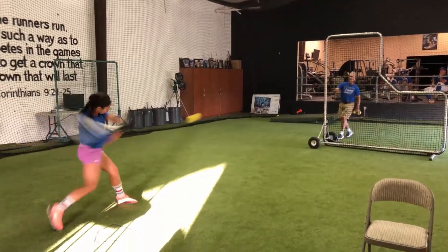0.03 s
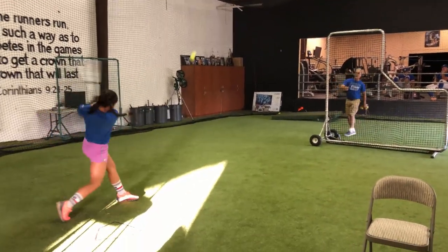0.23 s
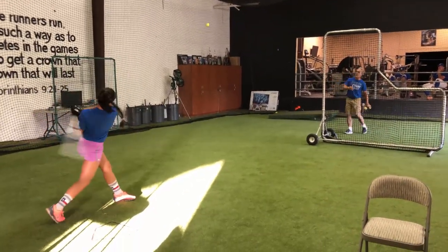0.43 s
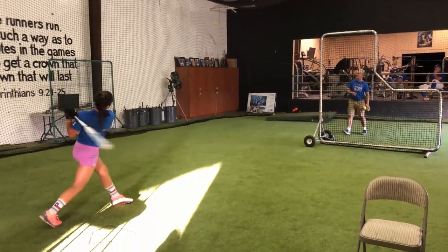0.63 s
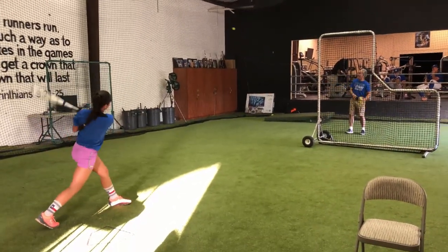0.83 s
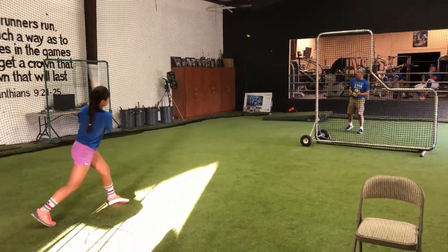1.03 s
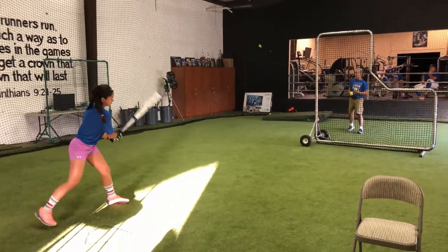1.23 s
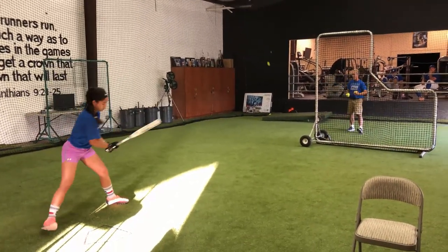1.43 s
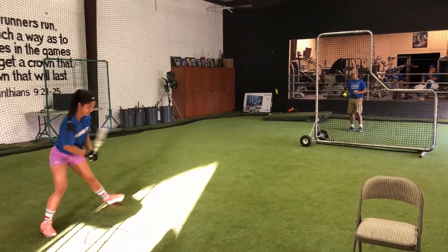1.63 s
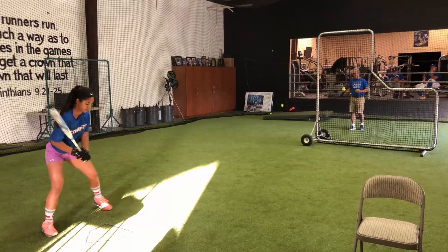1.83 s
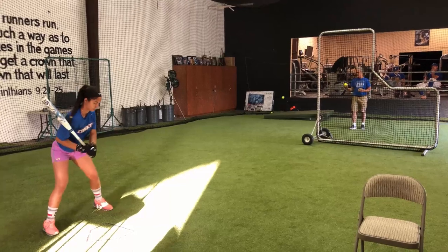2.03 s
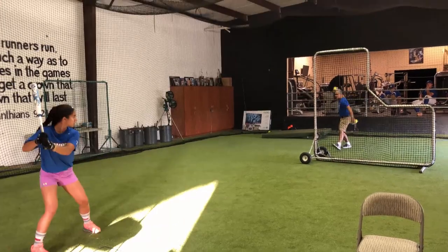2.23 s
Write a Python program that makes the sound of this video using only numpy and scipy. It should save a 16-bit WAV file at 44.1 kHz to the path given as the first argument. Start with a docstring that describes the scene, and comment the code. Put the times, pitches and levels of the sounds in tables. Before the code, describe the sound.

A metal bat hits a softball with a hard, ringing crack that echoes through a large indoor batting hall. The ball slaps into distant netting, then lands with a soft low thud, over faint steady ventilation.

```python
"""In a big indoor batting hall, a metal bat swishes and hits a softball with a hard crack.
The impact excites modes of bat and ball, whose ring hangs in the room as reverberation.
Half a second later the ball slaps into the far netting and the wall behind it rumbles.
A shoe scuffs the turf and the ball lands with a low thud, over the steady rush of ventilation."""
import sys
import numpy as np
from scipy import signal
from scipy.fft import rfft, irfft, next_fast_len
from scipy.io import wavfile
from scipy.ndimage import map_coordinates

SR = 44100
rng = np.random.default_rng(int(sys.argv[2]) if len(sys.argv) > 2 else 0)


def dump_mix(stems):
    """Bounce the given channels to the path in sys.argv[1] as a 16-bit WAV at rate SR."""
    frames = np.atleast_2d(stems).T  # one column per channel
    limited = np.clip(frames, -1, 1)  # hard clip at full scale
    pcm = np.round(limited * 32767).astype(np.int16)
    wavfile.write(sys.argv[1], SR, pcm)


N = 101429

HIT_S, CONTACT_S = 0.2126, 0.0013
HALL_DELAY_S, HALL_BUILD_S = 0.014, 0.003
# Modes of bat and ball. Each row: frequency in Hz, relative direct level in dB, T60 in seconds,
# level over the crack in the hall in dB, spread in the hall in Hz.
BAT_MODES = [(500, -13, .014, 0.5, 200), (649.5, -11, .016, 2.5, 240), (1212, -11.5, 0.016, 10, 120),
             (1406, -22, .022, 11.5, 62), (1852, -17, .014, -12, 72), (2230, -21.5, 0.012, 5.5, 120),
             (2935, -10, 0.0076, -9, 120), (3440, -30, 0.04, 8.5, 55), (3640, -28, 0.0067, 13.5, 40),
             (4840, -18, 0.037, 9.5, 88), (5087, -26.5, 0.024, 14.5, 110), (6360, -9.5, 0.011, 6, 170),
             (6736, -20.5, 0.019, 10.5, 130), (7440, -22.5, .014, -4, 120), (9960, -15, .011, 0.5, 390)]


def bat():
    """Impact excitation: a noisy crack and damped modes, the lower ones starting later and more slowly."""
    sound = amp(-14.5) * rng.standard_normal(N) * fall(since(0), t60=0.012)
    for hz, db, t60, _, _ in BAT_MODES:
        slowness = max(1, 2480 / hz)
        lag = 1.2 / hz  # 1.2 cycles
        envelope = swell(lag, CONTACT_S * slowness, 0, t60)
        sound += 2 * amp(db) * slowness ** .5 * np.sin(2 * np.pi * hz * since(lag)) * envelope
    return amp(2) * delayed(sound, HIT_S)


def ring_colour(hz):
    """Spectral broadening: the swing and the many paths spread each mode into a band over the crack."""
    # The crack in the hall. Each row: frequency in Hz, level in dB.
    crack_spectrum = [(60, -41.5), (130, -27), (210, -5), (350, -2), (520, -2.5), (900, 2.5), (1700, -1.5),
                      (2600, -2), (3100, -3), (4300, 0), (5700, -4), (7500, -1.5), (9000, -8), (11500, -9),
                      (15500, -8.5)]
    bands = sum(amp(db) ** 2 * np.exp(-((hz - centre) / spread) ** 2)
                for centre, _, _, db, spread in BAT_MODES)
    return amp(along(crack_spectrum, hz)) * np.sqrt(1 + bands)


def bat_in_hall():
    """Reflection: the hit returns as near scatter, duller wall echoes and a reverberant tail."""
    # Echoes smeared by netting and clutter. Each row: delay in seconds, level in dB, T60 in seconds,
    # treble cutoff in Hz.
    reflections = [(.0135, -9, 0.021, 6510), (.0305, -19, 0.032, 12060), (.073, -17, 0.041, 7540),
                   (.111, -28.5, 0.025, 5500), (.346, -30.5, 0.035, 3980)]
    scatter = amp(-30) * shaped(ring_colour) * swell(HIT_S, CONTACT_S, 0, t60=0.32)
    echoes = np.zeros(N)
    for delay, db, t60, cutoff in reflections:
        dulled = shaped(lambda hz: ring_colour(hz) / np.hypot(1, (hz / cutoff) ** 2))
        echoes += amp(db) * dulled * swell(HIT_S + delay, rise=0.0035, hold=0.0035, t60=t60)
    tail = absorbed(shaped(ring_colour)) * (1 - np.exp(-since(0) / HALL_BUILD_S))
    return scatter + echoes + amp(-19) * delayed(tail, HIT_S + HALL_DELAY_S)


def netting():
    """Momentum transfer: the ball jerks the net into a grainy rattle with two sharp ticks."""
    # Jerks of the net. Each row: start in seconds, level in dB, rise, hold and T60 in seconds,
    # tilt in dB per octave.
    jerks = [(0.7076, -34.5, 0.002, 0.027, 0.15, 1), (1.005, -51.5, 0.022, 0.071, .15, -1)]
    # The net's spectrum. Each row: frequency in Hz, level in dB.
    spectrum = [(400, -17), (1500, -11.5), (2100, -4.5), (2900, 0.5), (4200, -3.5), (5500, -8.5),
                (7200, -11), (11000, -20), (15500, -21.5)]
    # Ticks. Each row: start in seconds, level in dB.
    ticks = [(0.7126, -21), (1.178, -44)]
    rattle = bursts(jerks, spectrum)
    tick_envelope = sum(amp(db) * (since(s) > 0) * fall(since(s), t60=0.0055) for s, db in ticks)
    ticking = noise(spectrum) * tick_envelope
    grain = unit(amp(1.5 * wobble(700)))
    return with_hall(rattle * grain + ticking)


def wall():
    """Panel resonance: the wall behind the net rumbles on after the ball reaches it."""
    # The panels' spectrum. Each row: frequency in Hz, level in dB.
    spectrum = [(25, -40), (48, 8), (64, 4), (78, -2), (95, -3), (124, -10), (150, -31), (185, -1),
                (260, -29), (500, -43.5)]
    return amp(-42.5) * noise(spectrum) * swell(0.81, rise=0.01416, hold=0, t60=1.2)


def thud():
    """Room resonance: the ball's soft push on the turf sets the hall's low modes booming."""
    # The landing and its wall echo. Each row: time in seconds, level in dB, frequency in Hz,
    # half width in seconds.
    pulses = [(1.8987, -15, 314, 0.0016), (1.9137, -17.5, 160, 0.0089)]
    # The hall's boom. Each row: frequency in Hz, level in dB.
    spectrum = [(60, -57), (100, -6.5), (130, 2), (160, -1.5), (185, -11.5), (225, -0.5), (300, -12.5),
                (450, -18), (700, -31.5), (1500, -33.5), (4000, -63)]
    # Room modes. Each row: frequency in Hz, level in dB, rise and T60 in seconds.
    room_modes = [(126.6, -21.5, .07, 1.03), (151, -28.5, 0.0033, 0.3)]
    t = since(0)
    push = sum(-amp(db) * np.cos(2 * np.pi * hz * (t - s)) * np.exp(-((t - s) / width) ** 2)
               for s, db, hz, width in pulses)
    push = signal.sosfilt(signal.butter(2, 90, "high", fs=SR, output="sos"), push)  # no deep bass
    start = pulses[0][0] + 0.011
    boom = amp(-27.5) * delayed(absorbed(noise(spectrum)), start)
    modes = sum(amp(db) * np.sin(2 * np.pi * hz * since(start)) * swell(start, rise, 0, t60)
                for hz, db, rise, t60 in room_modes)
    return push + boom + modes


def swishes():
    """Friction: the swing and the shoe on the turf each make soft broadband noise."""
    # Swing and scuffs. Each row: start in seconds, level in dB, rise, hold and T60 in seconds,
    # tilt in dB per octave.
    strokes = [(.10, -50.5, .025, .035, .15, 1), (1.757, -62, .03, .12, 0.27, 5),
               (1.899, -48, .015, .025, 0.17, -3.3)]
    # The friction spectrum. Each row: frequency in Hz, level in dB.
    spectrum = [(300, -21.5), (1200, 5.5), (3000, 5), (6000, 0), (10000, -10), (15000, -12.5)]
    return with_hall(bursts(strokes, spectrum))


def ventilation():
    """Flow noise: moving air rushes steadily over a low hum of drifting phase."""
    # The rush of air. Each row: frequency in Hz, level in dB.
    spectrum = [(20, -30), (32, -16.5), (47, -16), (60, -0.5), (75, -2.5), (100, -0.5), (135, 0.5),
                (190, -6.5), (240, -6), (330, -14), (420, -19), (700, -19), (1150, -15), (1900, -21.5),
                (3900, -32), (7000, -42), (11000, -49.5), (15500, -49)]
    hum = amp(-55) * np.sqrt(2) * np.sin(2 * np.pi * 61 * since(0) + 0.9 * wobble(10))
    return hum + amp(-48.5 - 0.1 * wobble(9)) * noise(spectrum)


def with_hall(x):
    """Reverberation: x plus its convolution with the hall's diffuse impulse response."""
    # The diffuse field. Each row: frequency in Hz, level in dB.
    spectrum = [(300, 6.5), (1300, 1), (3300, -3.5), (6000, -0.5), (10000, -3), (15000, -5.5)]
    response = absorbed(noise(spectrum)) * (1 - np.exp(-since(0) / HALL_BUILD_S))
    diffuse = signal.fftconvolve(x, response / np.linalg.norm(response))[:N]
    return x + amp(-4) * delayed(diffuse, HALL_DELAY_S)


def absorbed(x):
    """Absorption: each frequency of x fades at its own rate in the hall."""
    # Reverberation times. Each row: frequency in Hz, T60 in seconds.
    decay_times = [(100, 1.1), (500, 1.077), (1300, 1.234), (3500, 1.31), (6500, 0.84), (10000, .64),
                   (15000, 0.33)]
    hz, t, spectra = signal.stft(x, SR, nperseg=256)
    decay = fall(t, along(decay_times, hz)[:, None])
    return signal.istft(spectra * decay, SR, nperseg=256)[1][:N]


def bursts(events, spectrum):
    """Superposition of one enveloped noise for each event."""
    return sum(amp(db) * noise(spectrum, tilt_db) * swell(start, rise, hold, t60)
               for start, db, rise, hold, t60, tilt_db in events)


def noise(spectrum, tilt_db=0):
    """Noise with a spectrum of (Hz, dB) points, tilted per octave."""
    return shaped(lambda hz: amp(along(spectrum, hz) + tilt_db * np.log2(hz + 1)))


def shaped(gain):
    """White noise filtered by gain(Hz), at rms 1."""
    size = next_fast_len(N)
    white = rfft(rng.standard_normal(size))
    return unit(irfft(white * gain(np.fft.rfftfreq(size, 1 / SR)), size)[:N])


def amp(db):
    """Decibels to gain."""
    return 10 ** (np.asarray(db) / 20)


def unit(x):
    """Scaled to rms 1."""
    return x / np.sqrt(np.mean(x ** 2) + 1e-20)


def along(points, hz):
    """Interpolation of (Hz, value) points on a log axis."""
    frequencies, values = np.transpose(points)
    return np.interp(np.log(hz + 1), np.log(frequencies + 1), values)


def since(start):
    """Seconds since start, zero before it."""
    return np.maximum(np.arange(N) / SR - start, 0)


def fall(t, t60):
    """Exponential decay, 60 dB in t60 seconds."""
    return np.exp(-np.log(1000) * t / t60)


def swell(start, rise, hold, t60):
    """Attack, hold and release, in seconds."""
    return (1 - np.exp(-since(start) / rise)) * fall(since(start + hold), t60)


def delayed(x, s):
    """x moved later by s seconds."""
    return np.pad(x, (max(round(s * SR), 0), 0))[:N]


def wobble(rate):
    """A smooth random curve, rate knots a second."""
    return map_coordinates(rng.standard_normal(N // 8), [np.arange(N) * rate / SR], mode="wrap")


def scene():
    """Superposition: all sources add at one microphone."""
    return (bat() + bat_in_hall() + netting() + wall() + swishes() + thud() + ventilation())[None]


def record(dry):
    """Saturation rounds the peaks; a quick fade ends the sound and a band limit cuts the top treble."""
    ceiling, knee = 0.72, 4.6
    end_s, fade_s, top_hz = 2.25, 0.011, 15850
    sound = dry / (1 + np.abs(dry / ceiling) ** knee) ** (1 / knee)
    sound *= np.clip((end_s - since(0)) / fade_s, 0, 1)
    size = next_fast_len(N + SR // 2)
    passband = np.fft.rfftfreq(size, 1 / SR) < top_hz
    return irfft(rfft(sound, size) * passband, size)[:, :N]


dry = scene()
out = record(dry)
dump_mix(out)
```